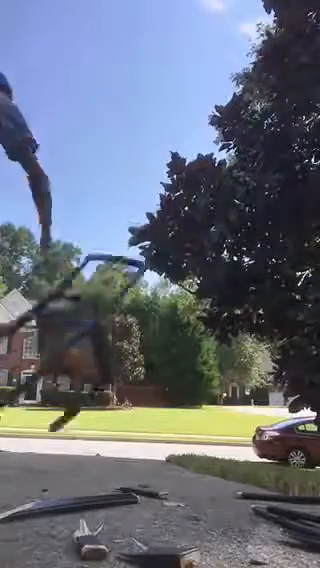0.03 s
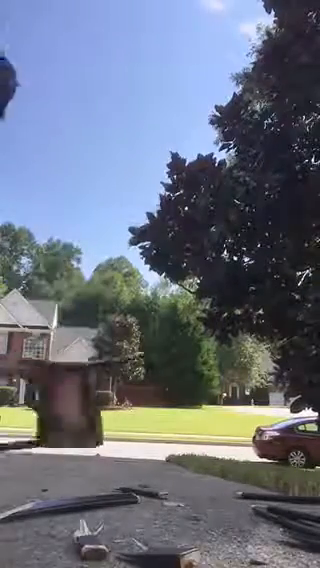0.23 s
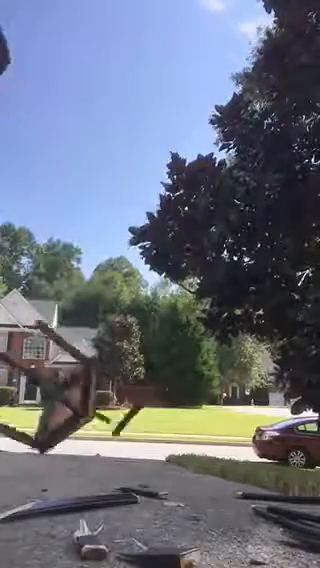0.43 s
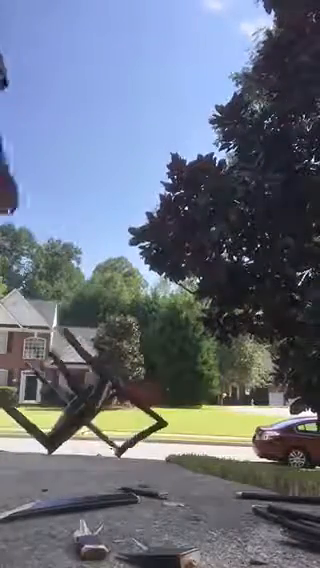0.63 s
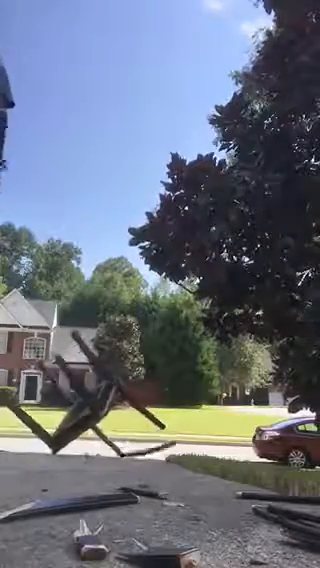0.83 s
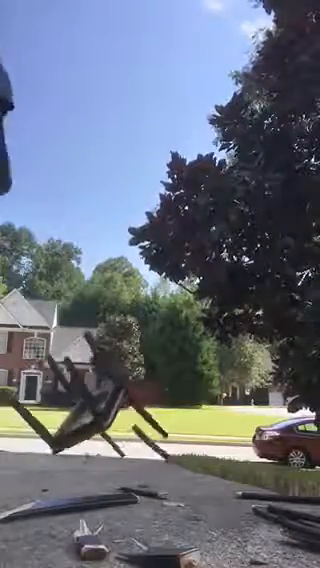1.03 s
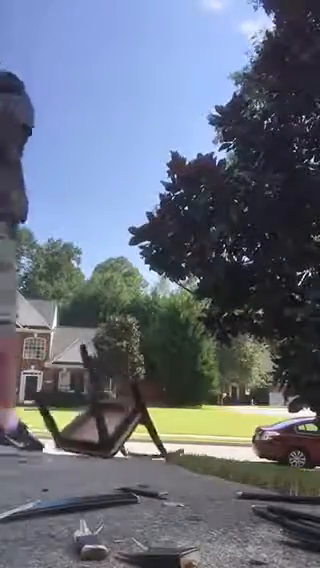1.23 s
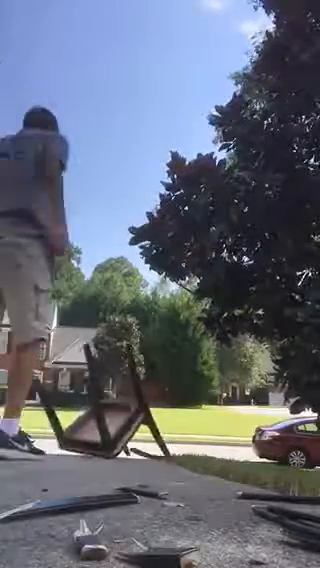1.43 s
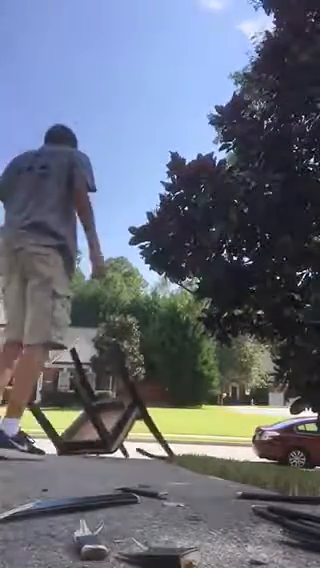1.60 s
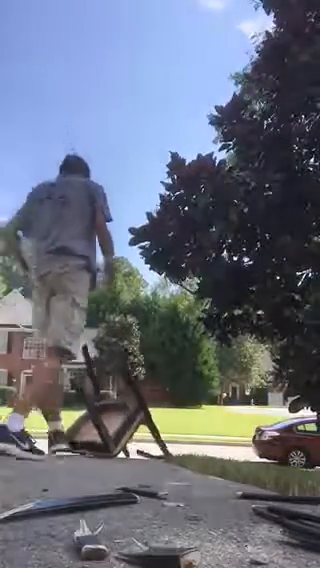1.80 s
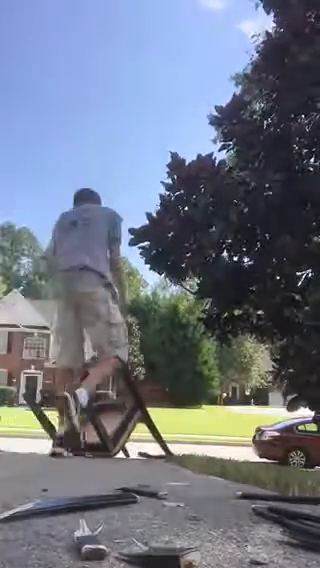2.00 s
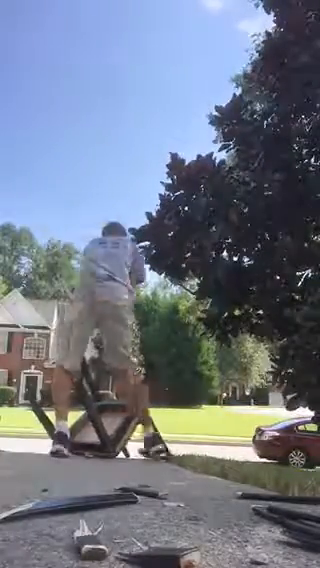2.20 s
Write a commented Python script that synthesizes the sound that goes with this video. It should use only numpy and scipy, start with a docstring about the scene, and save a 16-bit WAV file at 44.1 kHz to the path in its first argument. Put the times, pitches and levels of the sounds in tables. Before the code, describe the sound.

Wooden chair slammed on pavement, cracking and bouncing, followed by a few soft footsteps.

```python
"""A driveway among houses and trees, heard close up on a small microphone in a light breeze.
At 0.2 s a wooden chair is slammed down: a quick run of blows rings its frame and snaps its joints.
It bounces and sheds sticks, legs scrape, a loose screw jingles, and near 1.35 s it tips over.
From 1.6 s shoes scuff over the grit towards it. Throughout, the surroundings return a soft tail,
and in the second half gusts rumble on the microphone."""
import sys
import numpy as np
from scipy import signal
from scipy.fft import rfft, irfft
from scipy.io import wavfile

SR = 44100
rng = np.random.default_rng(int(sys.argv[2]) if len(sys.argv) > 2 else 0)


def put_to_file(sound):
    """Save the sound as 16-bit audio at rate SR, in the file named by the first command-line argument."""
    columns = np.atleast_2d(sound).T  # one column per channel
    safe = np.clip(columns, -1, 1)
    whole_steps = np.round(safe * 32767)
    wavfile.write(sys.argv[1], SR, whole_steps.astype(np.int16))


N = 103635
T = np.arange(N) / SR
EDGES_HZ = 25 * 2 ** (np.arange(29) / 3)  # third octaves
CENTRES_HZ = np.sqrt(EDGES_HZ[1:] * EDGES_HZ[:-1])
BANDS = [signal.butter(2, pair, "band", fs=SR, output="sos") for pair in zip(EDGES_HZ, EDGES_HZ[1:])]
ATTACK_S, ATTACK_CYCLES = 0.00013, 0.42  # low notes take longer to build
GRIT_RELEASE_S = 0.0026


# Wood hits the driveway, close to the microphone: start_s, thud_db, knock_db, crack_db
CHAIR_BLOWS = [(0.1943, -49, -10.5, -20), (0.2005, -21.5, -18, -20.5), (0.2092, -43, -8.5, -21),
               (0.2253, -24.5, -11, -24), (0.2294, -27.5, -9, -21), (0.2358, -18, -29, -19.5),
               (0.2519, -21.5, -17.5, -35.5), (0.4107, -26, -18, -28.5), (.4560, -32.5, -28, -45),
               (0.4950, -38, -31.5, -37.5), (0.6498, -35, -25, -40), (0.6622, -34.5, -27.5, -30.5),
               (0.791, -36.5, -30.5, -52), (.8080, -50, -30, -48), (.8950, -43, -40, -60),
               (.9190, -33, -42, -51.5), (0.970, -45, -41.5, -60.5), (1.34, -26, -21, -61),
               (1.3423, -34.5, -43.5, -35), (1.3663, -51, -29.5, -43.5), (1.3871, -32, -34, -58),
               (1.5936, -42.5, -30.5, -47.5)]
# Colour of a blow: band_hz, level_db
WOOD_COLOUR = [(45, -36), (90, -14), (150, -24.5), (240, -9.5), (500, -16.5), (1000, -10.5), (2800, -6.5),
               (4000, -18.5), (6500, -17), (10000, -29.5), (15000, -31)]
# Dense, short ring of the wood: band_hz, t60_s
WOOD_DECAY = [(100, 0.008), (1000, 0.11), (10000, 0.16)]
# Seat, legs and loose sticks sound their own notes, and a sole rings under one late step: start_s, pitch_hz,
# level_db, t60_s
SINGLE_NOTES = [(.1947, 1050, -8, 0.032), (.1947, 2310, -13.5, 0.053), (.2270, 150, -3.5, 0.047),
                (.2525, 1827, -21, 0.04), (.4112, 630.4, -13, 0.078), (.4105, 928, -11.5, 0.042),
                (0.495, 2644, -34, 0.081), (.6505, 603, -19.5, 0.031), (.6635, 1066, -16.5, 0.018),
                (.8080, 499.4, -32.5, 0.12), (1.023, 3510, -42.5, 0.018), (1.3382, 425, -22, 0.039),
                (1.5942, 1723, -38, 0.051), (2.048, 521, -37, 0.058)]

def chair():
    """Each blow cracks on the ground and rings the frame; struck legs and sticks add single notes, and one late
    step adds a sole's note."""
    out = np.zeros(N)
    for start_s, *levels in CHAIR_BLOWS:
        add(out, start_s, contact(levels, WOOD_COLOUR, WOOD_DECAY))
        add(out, start_s, frame_ring(levels))
    for start_s, hz, db, t60_s in SINGLE_NOTES:
        onset = 1 - np.exp(-T * hz / ATTACK_CYCLES)
        add(out, start_s, from_db(db) * ring(hz, t60_s) * onset)
    return out


# Modes of the chair's frame and seat: pitch_hz, level_db
FRAME_MODES = [(150, -7.5), (380, -8), (618, -11), (993, -9.5), (1164, -23), (1249, -14.5), (1641, -8),
               (1790, -5.5), (2371, -12.5), (2606, -7)]

def frame_ring(levels, spread_db=1.0, size=18000):
    """A blow wakes the frame's modes with strengths of its own; higher ones die a little sooner."""
    out = 0
    for hz, db in FRAME_MODES:
        polarity = rng.choice([-1, 1])
        gain = from_db(db + strength_db(levels, hz) + spread_db * rng.standard_normal())
        t60_s = 0.081 / (hz / 1000) ** 0.033
        out += polarity * gain * ring(hz, t60_s, size)
    return out * (1 - np.exp(-T[:size] / ATTACK_S))


def contact(levels, colour, decay, crack_t60_s=0.02, ring_db=-12, patchy_db=4, size=9000):
    """A short crack, treble first, then the weaker ring of countless modes; no two sound alike."""
    out = 0
    for hz, sos in zip(CENTRES_HZ, BANDS):
        onset = 1 - np.exp(-T[:size] / (ATTACK_S + ATTACK_CYCLES / hz))
        tail = from_db(ring_db) * fade(at_hz(decay, hz), size)
        envelope = onset * np.hypot(fade(crack_t60_s, size), tail)
        band = signal.sosfilt(sos, rng.standard_normal(size) * envelope)
        band *= np.sqrt(0.008 * SR / np.sum(band ** 2))  # the energy of 8 ms at rms 1
        db = at_hz(colour, hz) + strength_db(levels, hz) + rng.uniform(-patchy_db, patchy_db)
        out += from_db(db) * band
    return out


def strength_db(levels, hz):
    """How hard a contact drives a frequency: thud in the bass, knock in the middle, crack on top."""
    thud, knock, crack = levels
    return np.interp(np.log(hz), np.log([170, 450, 950, 2500]), [thud, knock, knock, crack])


# The chair's joints and fibres give way: start_s, peak_db
JOINT_SNAPS = [(0.199, -12.5), (0.212, -12.5), (0.2271, -12), (0.2343, -13.5), (0.2526, -18), (0.6633, -15)]

def breaking_joints(band_hz=(3600, 5630)):
    """Each breaking joint is a single sharp, bright snap."""
    sos = signal.butter(1, band_hz, "band", fs=SR, output="sos")
    snap = signal.sosfilt(sos, signal.sosfilt(sos, signal.unit_impulse(SR // 100)))
    snap /= np.abs(snap).max()
    out = np.zeros(N)
    for start_s, db in JOINT_SNAPS:
        add(out, start_s, from_db(db) * snap)
    return out


# Shoes land on the driveway, heading for the chair: start_s, thud_db, knock_db, crack_db
FOOTFALLS = [(1.624, -34, -46.5, -52.5), (1.672, -32, -48, -52), (1.826, -42, -49.5, -51.5),
             (1.844, -44.5, -53.5, -53.5), (1.954, -71, -54, -50.5), (2.009, -46, -54, -49),
             (2.047, -38.5, -39, -47.5), (2.156, -40, -69, -55)]
# Colour of a step: band_hz, level_db
SHOE_COLOUR = [(50, -15), (150, -12.5), (380, -2), (900, -10), (2800, -10.5), (15000, -55.5)]

def shoes(t60_s=0.09):
    """Soles land and scuff in soft contacts that die away alike in every band."""
    out = np.zeros(N)
    for start_s, *levels in FOOTFALLS:
        add(out, start_s, contact(levels, SHOE_COLOUR, decay=[(1, t60_s)]))
    return out


# Splinters and grit crushed at ground level: start_s, length_s, level_db
GRIT_RUNS = [(.055, 0.0095, -64.5), (.168, 0.02, -58.5), (.222, 0.015, -25), (0.53, 0.018, -50),
             (.762, 0.085, -48.5), (0.872, 0.069, -54.5), (.99, 0.048, -59), (1.328, 0.098, -51.5),
             (1.622, 0.074, -56), (1.887, 0.008, -59.5)]
# Colour of the crackle: band_hz, level_db
GRIT_COLOUR = [(1200, 0.5), (2700, 3), (6500, -2), (15000, -22)]

def grit(step_length_s=0.017, step_offset_db=-9):
    """Short runs of crackle, under sliding wood and under each step."""
    trodden = [(start_s, step_length_s, crack + step_offset_db) for start_s, _, _, crack in FOOTFALLS]
    return bursts(list(GRIT_RUNS) + trodden, GRIT_RELEASE_S) * coloured(fractures(), GRIT_COLOUR)


def fractures(grains_per_s=2000, spread_db=1.5, t60_cycles=55, pitches=24):
    """Tiny random fractures of uneven size, each ticking briefly at one of many pitches."""
    sizes = from_db(spread_db * np.minimum(rng.exponential(1, N), 3))
    clicks = (rng.random(N) < grains_per_s / SR) * rng.choice([-1, 1], N) * sizes
    pitch_index = rng.integers(0, pitches, N)
    out = 0
    for k, hz in enumerate(np.geomspace(1200, 15000, pitches)):
        radius = from_db(-60 * hz / (t60_cycles * SR))
        feedback = [1, -2 * radius * np.cos(2 * np.pi * hz / SR), radius ** 2]
        drive = clicks * (pitch_index == k) + 1e-18 * sizes  # the tiny floor avoids underflow
        out += (1 - radius ** 2) * signal.lfilter([1, 0, -1], feedback, drive)
    return out


# Legs and soles drag over the driveway: start_s, length_s, level_db
DRAGS = [(.70, 0.031, -40), (.757, 0.088, -46), (1.624, 0.0563, -45.5), (1.72, 0.012, -50)]
# Colour of their rasp: band_hz, level_db
RASP_COLOUR = [(100, -12.5), (700, -0.5), (2500, -20), (15000, -35.5)]

def scrapes():
    """Wood and soles catch and slip on the rough ground."""
    friction = rng.standard_normal(N) * uneven()
    return bursts(DRAGS, GRIT_RELEASE_S) * coloured(friction, RASP_COLOUR)


# A loose screw in the chair, faint at the microphone: start_s, length_s, level_db
SCREW_JINGLES = [(.828, 0.036, -62.5), (.92, 0.06, -73.5), (1.36, 0.063, -67)]

def screw(pitch_hz=11970, width_hz=410):
    """Countless light touches keep one thin note jingling unevenly."""
    band_hz = [pitch_hz - width_hz / 2, pitch_hz + width_hz / 2]
    sos = signal.butter(1, band_hz, "band", fs=SR, output="sos")
    ringing = rms_one(signal.sosfilt(sos, signal.sosfilt(sos, rng.standard_normal(N))))
    return bursts(SCREW_JINGLES, release_s=0.016) * ringing * uneven()


# What the surroundings send back to the microphone: band_hz, near_db, far_db
YARD_SCATTER = [(80, -27.5, -36.5), (280, -10.5, -20.5), (1209, -17.5, -21.5), (7040, -14, -13),
                (14000, -12, -22.5)]
# Tail from the houses and trees farther off: band_hz, t60_s
FAR_DECAY = [(900, 1.73), (3500, 0.31), (14000, 0.64)]

def yard_echo(direct, near_t60_s=0.24, rise_s=0.0046):
    """Quick scatter from nearby walls and a long faint tail from houses and trees."""
    scatter = np.array(YARD_SCATTER)
    swell = 1 - np.exp(-(T / rise_s) ** 2)
    response = 0
    for hz, sos in zip(CENTRES_HZ, BANDS):
        near = from_db(at_hz(scatter[:, [0, 1]], hz)) * rms_one(swell * fade(near_t60_s))
        far = from_db(at_hz(scatter[:, [0, 2]], hz)) * rms_one(swell * fade(at_hz(FAR_DECAY, hz)))
        response += signal.sosfilt(sos, rng.standard_normal(N)) * np.hypot(near, far) / np.sqrt(N)
    return signal.fftconvolve(direct, response)[:N]


# Gusts right on the microphone: time_s, level_db
GUSTS = [(.68, -61.5), (.94, -45), (1.12, -42), (1.29, -56.5), (1.45, -47.5), (1.52, -36), (1.57, -45),
         (1.92, -52), (2.08, -48), (2.17, -37.5), (2.27, -49.5), (2.31, -44)]
# Colour of their rumble: band_hz, level_db
RUMBLE_COLOUR = [(25, -14.5), (55, 2.5), (110, -2), (350, -16), (1200, -53.5)]
# Colour of the open air all around: band_hz, level_db
HUSH_COLOUR = [(200, 3.5), (500, -2.5), (7000, -10), (15000, -25)]

def breeze(hush_db=-59):
    """Wind rumbles on the microphone over a steady outdoor hush."""
    gusts = from_db(np.interp(T, *np.transpose(GUSTS)))
    rumble = gusts * coloured(rng.standard_normal(N), RUMBLE_COLOUR)
    hush = from_db(hush_db) * coloured(rng.standard_normal(N), HUSH_COLOUR)
    return rumble + hush


def from_db(db):
    """Decibels to gain."""
    return 10 ** (np.asarray(db) / 20)


def rms_one(x):
    """Scale to rms 1."""
    return x / np.sqrt(np.mean(x ** 2) + 1e-20)


def at_hz(points, hz):
    """Read a table on a log-frequency axis."""
    points = np.array(points)
    return np.interp(np.log(hz), np.log(points[:, 0]), points[:, 1])


def fade(t60_s, size=N):
    """Exponential decay from 1."""
    return np.exp(-np.log(1000) * T[:size] / t60_s)


def ring(hz, t60_s, size=N):
    """One decaying mode."""
    return np.sin(2 * np.pi * hz * T[:size]) * fade(t60_s, size)


def add(out, start_s, sound):
    """Mix a sound in at its start time."""
    start = int(start_s * SR)
    out[start:start + len(sound)] += sound[:N - start]


def coloured(x, colour):
    """Shape a white signal to the given balance of third octaves; rms 1."""
    hz = np.maximum(np.arange(N + 1) * SR / (2 * N), 1)
    subsonic_rolloff = np.minimum(hz / EDGES_HZ[0], 1) ** 2
    gain = from_db(at_hz(colour, hz)) / np.sqrt(hz) * subsonic_rolloff
    return rms_one(irfft(rfft(x, 2 * N) * gain)[:N])


def bursts(rows, release_s, attack_s=0.00048):
    """An envelope that rises, holds and releases for each row."""
    out = np.zeros(N)
    attack = 1 - np.exp(-T / attack_s)
    for start_s, length_s, db in rows:
        release = np.exp(-np.maximum(T - length_s, 0) / release_s)
        add(out, start_s, from_db(db) * attack * release)
    return out


def uneven(changes_per_s=270, spread_db=1.5):
    """A gain that flickers at random; rms 1."""
    flicker = np.interp(T * changes_per_s, np.arange(N), rng.standard_normal(N))
    return rms_one(from_db(spread_db * flicker))


def scene():
    """Everything on the driveway, its echoes and the breeze, at one microphone."""
    direct = chair() + breaking_joints() + screw() + shoes() + grit() + scrapes()
    return (direct + yard_echo(direct) + breeze())[None]


def record(dry, low_cut_hz=52, stopband_hz=16700):
    """The small microphone loses the deepest bass; the loudest peaks are rounded and the top is cut."""
    low_cut = signal.butter(2, low_cut_hz, "high", fs=SR, output="sos")
    high_cut = signal.cheby2(14, 60, stopband_hz, fs=SR, output="sos")
    rounded = np.tanh(signal.sosfilt(low_cut, dry))
    return signal.sosfilt(high_cut, rounded)


dry = scene()
out = record(dry)
put_to_file(out)
```